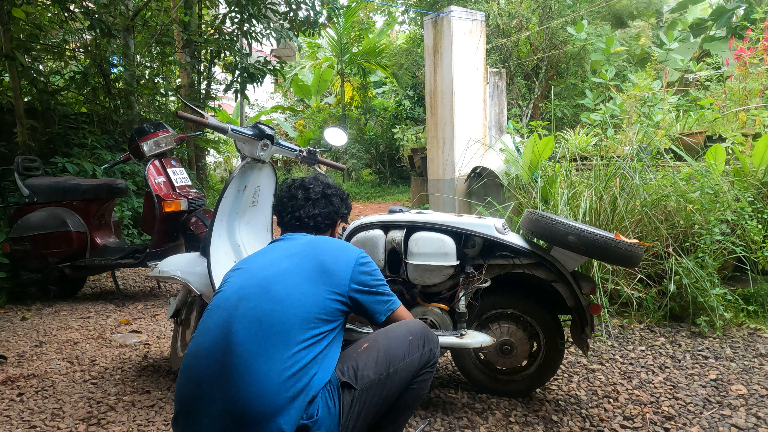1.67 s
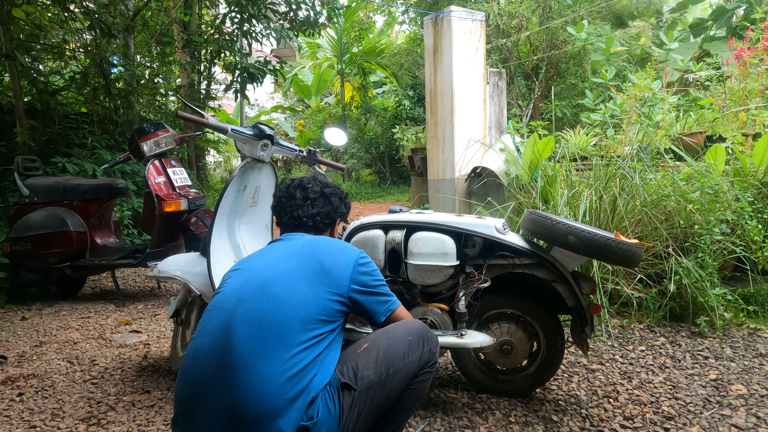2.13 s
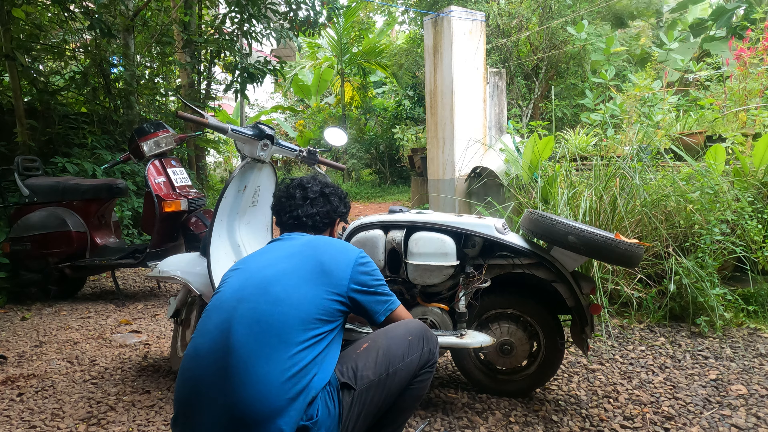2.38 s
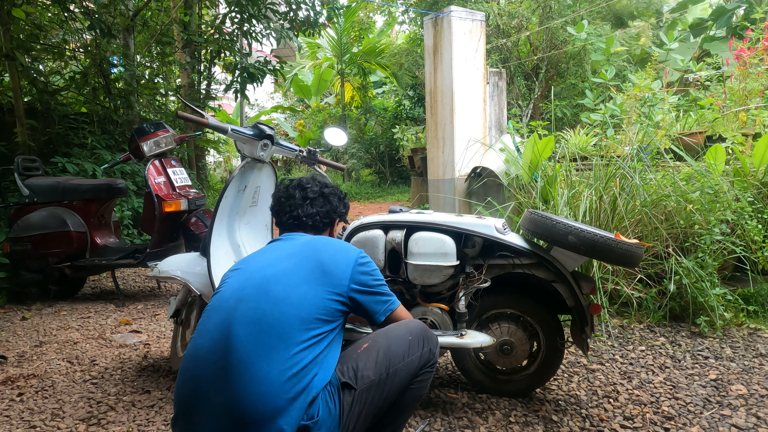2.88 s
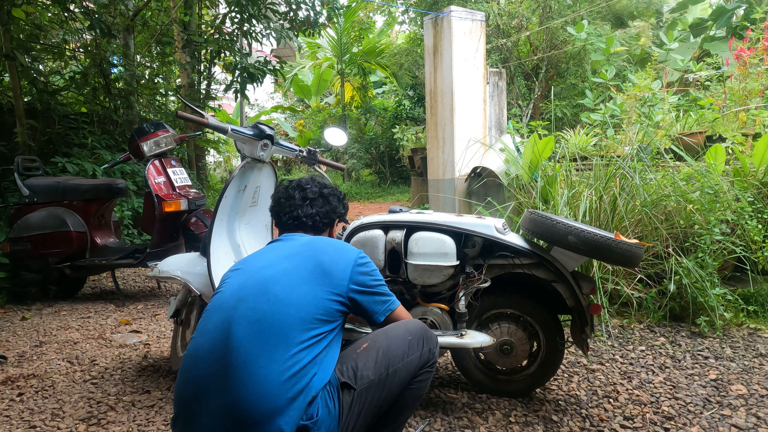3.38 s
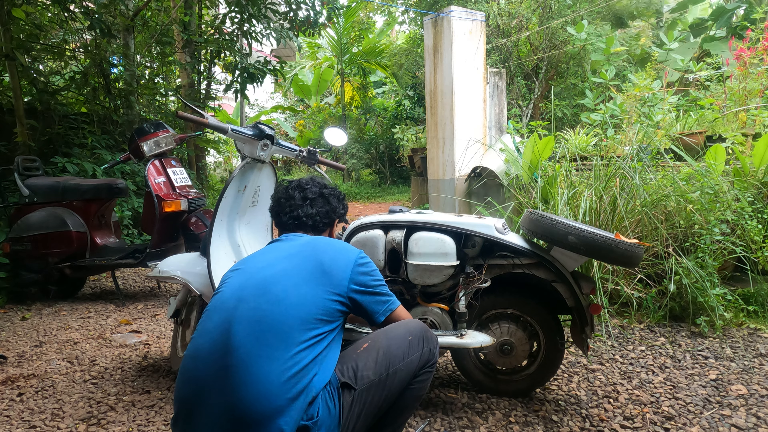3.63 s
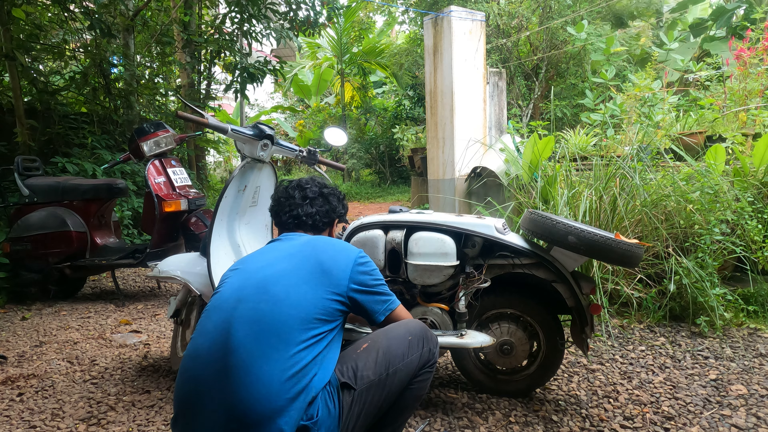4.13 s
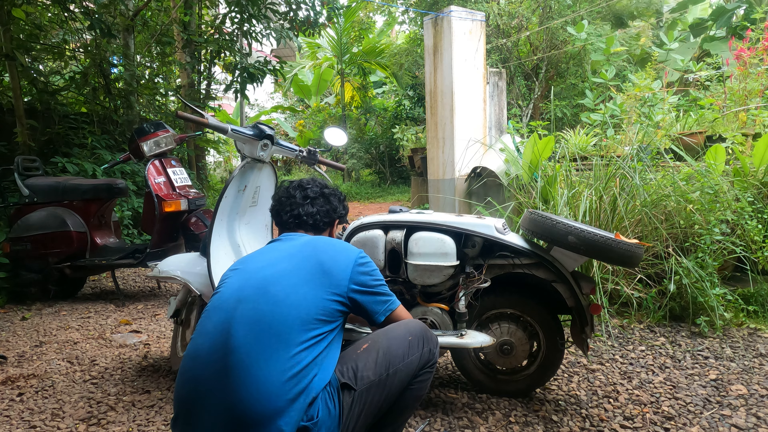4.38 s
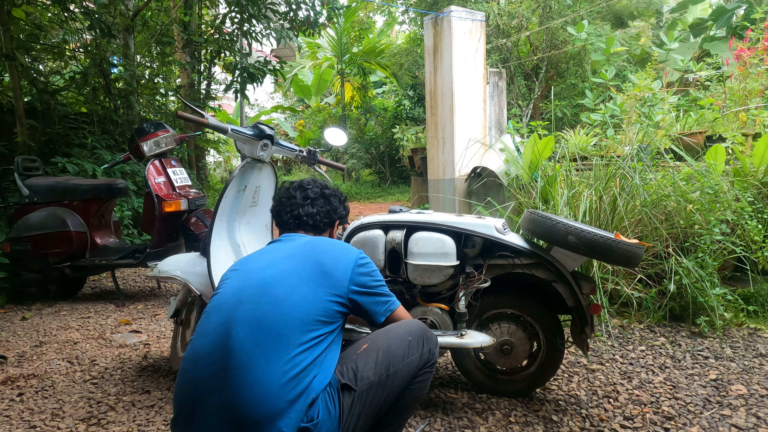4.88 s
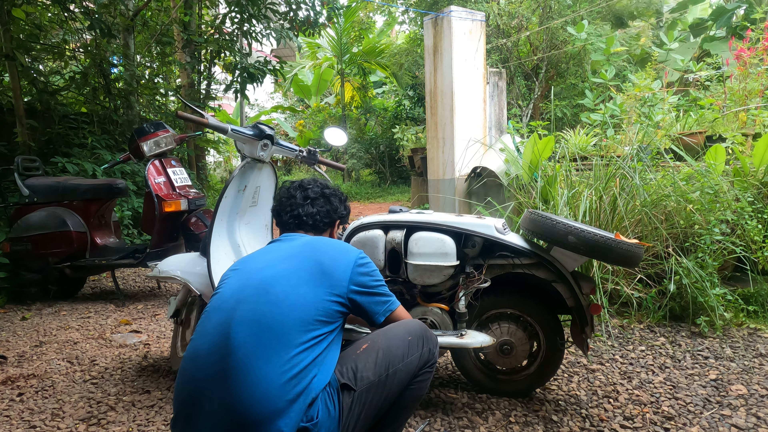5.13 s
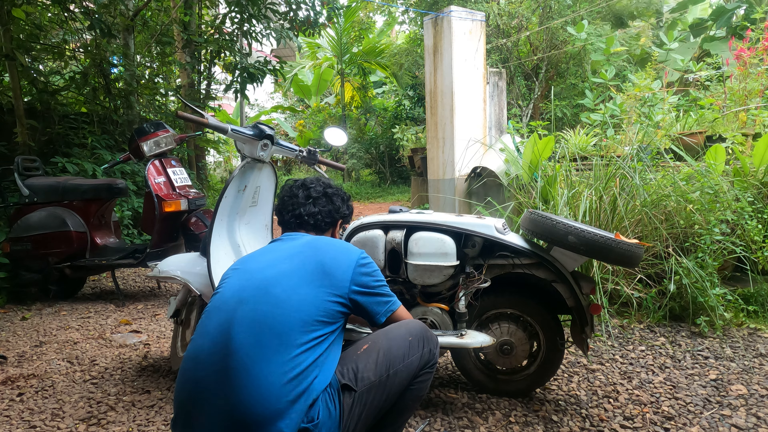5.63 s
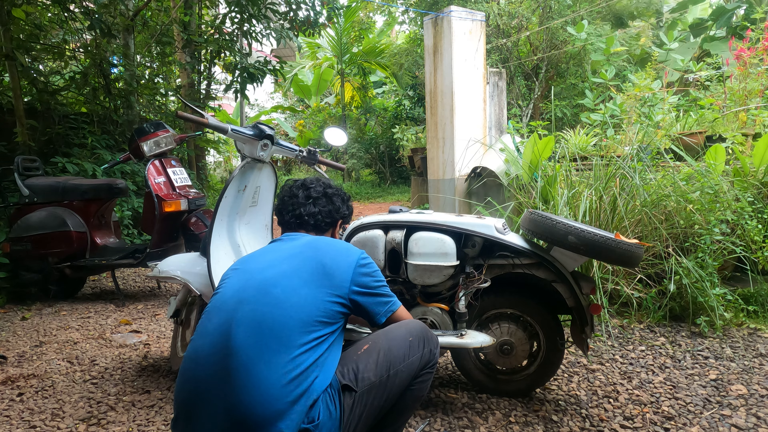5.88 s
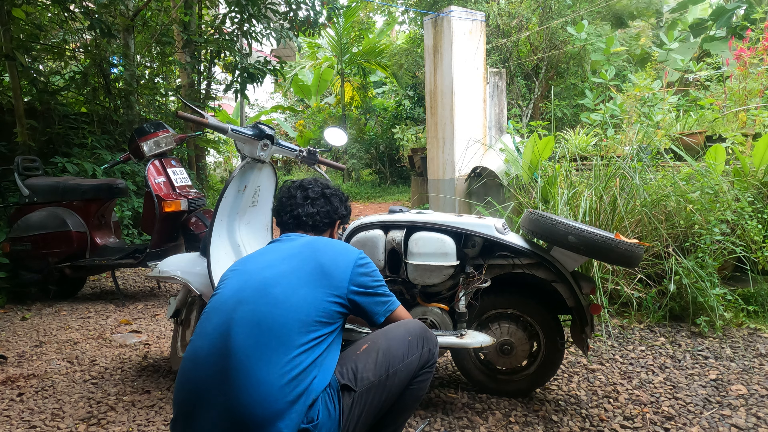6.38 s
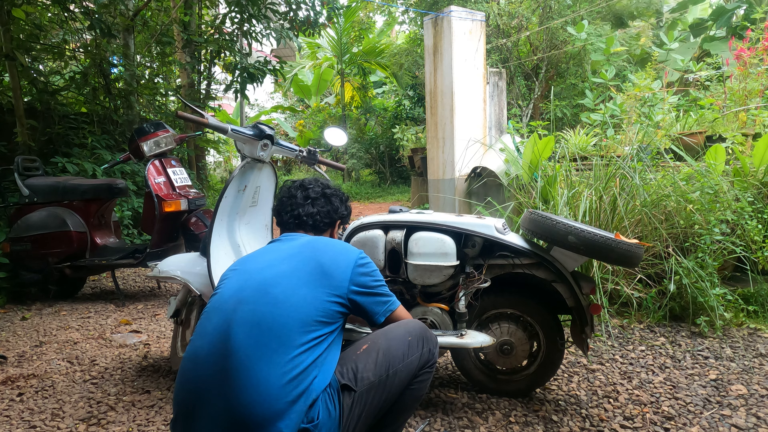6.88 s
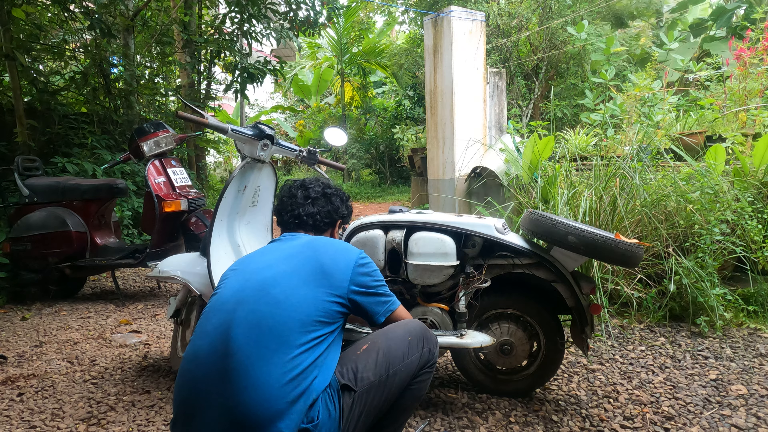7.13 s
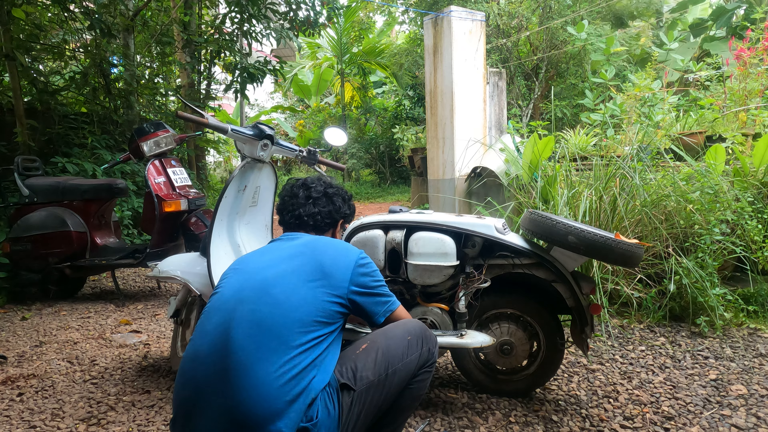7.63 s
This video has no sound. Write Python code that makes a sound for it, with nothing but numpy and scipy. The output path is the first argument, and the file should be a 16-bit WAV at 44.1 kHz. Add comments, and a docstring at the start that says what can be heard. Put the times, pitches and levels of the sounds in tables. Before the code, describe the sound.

A dense, piercing insect chorus dominates outdoors; soft metallic taps come early, then a burst of crunchy gravel shuffling from a squatting man, with faint distant birds.

```python
"""Two near cicadas repeat falling phrases in a leafy garden; a third holds a note and more blur far off.
Each song is a membrane buckled in pulses, heard direct and as scatter; shaped noise is the far chorus' hiss.
A man squatting at a scooter shifts on gravel (showers of clicks) and ticks metal (decaying partials).
Far off, a crow pulses air through its throat and a small bird pipes sines, over noise of traffic and wind.
Two microphones are sampled at 24 kHz, so a faint mirror image of the song lies above 12 kHz."""
import sys
import numpy as np
from scipy import signal
from scipy.fft import rfft, irfft
from scipy.io import wavfile
from scipy.ndimage import uniform_filter1d

SR = 44100
rng = np.random.default_rng(int(sys.argv[2]) if len(sys.argv) > 2 else 0)


def to_linear_factor(level_db):
    """Convert decibel levels (scalar or array-like) to linear amplitude factors."""
    exponent = np.asarray(level_db, float) / 20
    return 10 ** exponent


def file_out(sig):
    """Save sig as 16-bit WAV at sys.argv[1]."""
    # one column per channel
    cols = np.atleast_2d(sig).T
    # limit, then scale
    lim = np.clip(cols, -1, 1)
    pcm = np.round(lim * 32767).astype(np.int16)
    wavfile.write(sys.argv[1], SR, pcm)


N = 341775
T = np.arange(N) / SR  # s
HZ = np.fft.rfftfreq(N, 1 / SR)
SIDES = np.array([[1], [-1]])  # sign of a side signal at the left and right microphone
SAMPLING_HZ = 24000


def points(table, hz=HZ):
    """Gain per frequency through (Hz, dB) points on a log axis."""
    f, db = np.transpose(table)[:2]
    return to_linear_factor(np.interp(np.log(hz + 1), np.log(f + 1), db))


def curve(rows):
    """Straight lines through (s, value) points."""
    return np.interp(T, *np.transpose(rows))


def shape(x, gain):
    """Filter by a gain per frequency."""
    return irfft(rfft(x) * gain, N)


def unit(x):
    """Scale to rms 1."""
    return x / np.sqrt(np.mean(x ** 2))


def ring(x, modes):
    """Sum of (Hz, width in Hz, dB) resonances excited by x."""
    out = 0
    for hz, width, db in modes:
        b, a = signal.iirpeak(hz, hz / width, fs=SR)
        out = out + to_linear_factor(db) * signal.lfilter(b, a, x)
    return out


def walk(rate):
    """Smooth chance with about rate new values per second, spread near 1."""
    k = int(SR / rate)
    steps = np.repeat(rng.standard_normal(N // k + 1), k)
    return 1.287 * uniform_filter1d(uniform_filter1d(steps, k), k)[:N]


def swell(s, hold_s, db, rise_db_per_s, fall_db_per_s):
    """Gain that climbs to db at s, holds, and falls away."""
    early = np.clip(s - T, 0, None)
    late = np.clip(T - s - hold_s, 0, None)
    return to_linear_factor(db - rise_db_per_s * early - fall_db_per_s * late)


def garden(x, wet_db, t60, wide=0.97):
    """Direct sound plus decaying scatter from leaves and walls, partly different at the two microphones."""
    t = T[:int(.6 * SR)]
    tails = rng.standard_normal((2, len(t))) * np.exp(-np.log(1000) * t / t60)
    tails *= to_linear_factor(wet_db) / np.sqrt(np.sum(tails ** 2) / 2)
    fed = x * np.clip(T / .02, 0, 1) ** 2  # eases the scatter in at the start
    mid, side = (signal.fftconvolve(fed, tail)[:N] for tail in tails)
    return x + mid + wide * side * SIDES


# Spectrum of the low, distant air noise. Each row: frequency in Hz, relative density in dB per Hz.
AIR_SPECTRUM = [(12, -42), (20, -3), (44, -7), (103, -16.5), (193, -18), (229, -25), (629, -40.5),
                (1540, -35.5), (1690, -36.5), (1900, -31), (2470, -69), (4180, -120)]


def distant_traffic():
    """Far rumble: noise above 90 Hz, with less difference between the microphones at low pitch."""
    mid, side = rng.standard_normal((2, N))
    spread = shape(side, np.clip(HZ / 600, .25, .45))
    rumble = shape(mid + spread * SIDES, points(AIR_SPECTRUM) * (HZ > 90))
    return to_linear_factor(-58) * unit(rumble) * to_linear_factor(0.91 * walk(3.15))


# Spectrum of the far insect chorus' hiss. Each row: frequency in Hz, relative density in dB per Hz.
FAR_HISS_SPECTRUM = [(1500, -61), (2300, 9), (3600, -15.5), (5200, -5.5), (6500, -5.5), (8000, -7.5),
                     (9500, 13.5), (11000, -4), (12000, -14.5)]


def far_hiss():
    """Steady hiss of the far insect chorus, strongest near 2.3 and 9.5 kHz: noise, partly unlike in each ear."""
    hiss, hiss_side = rng.standard_normal((2, N))
    return to_linear_factor(-41.0) * unit(shape(hiss + 0.46 * hiss_side * SIDES, points(FAR_HISS_SPECTRUM)))


# Wind at the microphones. Each row: time in seconds, level before the gusts in dB.
WIND_LEVEL = [(0, -48.5), (1.8, -50.5), (2.5, -46.5), (3.1, -49.5), (3.5, -44), (4.0, -43.5), (4.6, -49.5),
              (6.0, -50), (6.6, -47), (7.75, -51.5)]


def wind():
    """Wind rumble up to 90 Hz, almost the same at both microphones, swaying in random gusts."""
    gust_db, gusts_per_s = 2.5, 12
    gust, side = rng.standard_normal((2, N))
    rumble = shape(gust + 0.037 * side * SIDES, points(AIR_SPECTRUM) * (HZ <= 90))
    return unit(rumble) * to_linear_factor(curve(WIND_LEVEL) + gust_db * walk(gusts_per_s))


# Calls of the far crow. Each row: start of the hold in seconds, hold in seconds, gain in dB.
CAW_CALLS = [(2.54, .14, -55.5), (6.6, 0.14, -57)]
# Resonances of its throat. Each row: frequency in Hz, width in Hz, gain in dB.
THROAT_MODES = [(1220, 53, -11), (1310, 60, -10), (1384, 80, -10), (1550, 211, -11), (1810, 45, 4)]


def crow():
    """Hoarse far caws: a pulse and a puff of air in each cycle ring the throat."""
    pitch_hz, jitter, breath_db = 90.5, .025, -1
    rise_db_per_s, fall_db_per_s = 150, 140
    turns = np.cumsum(pitch_hz * (1 + jitter * walk(40))) / SR
    pulses = np.diff(np.floor(turns), prepend=0)
    puffs = np.exp(-(turns % 1) / 0.97) * rng.standard_normal(N)
    hoarse = unit(pulses) + to_linear_factor(breath_db) * unit(puffs)
    band = points([(1050, -25), (1200, 0), (1950, -2.5), (2300, -20)])  # (Hz, dB)
    voice = unit(shape(ring(hoarse, THROAT_MODES), band))
    caws = voice * sum(swell(*row, rise_db_per_s, fall_db_per_s) for row in CAW_CALLS)
    return garden(caws, -8, .15)


# Notes of the small far bird. Each row: start in seconds, length in seconds, pitch in Hz, gain in dB.
PIPING_NOTES = [(4.65, .07, 989, -66.5), (4.745, .11, 989, -64.5), (4.845, .1, 989, -65),
                (4.94, .12, 989, -67.5), (6.64, .09, 796, -63.5)]


def small_bird():
    """Soft far piping: sine notes that swell and fade, a little unsteady in strength."""
    pipe = 0
    for s, length, hz, db in PIPING_NOTES:
        rise_and_fall = np.sin(np.pi * np.clip((T - s) / length, 0, 1)) ** 2
        pipe = pipe + to_linear_factor(db) * rise_and_fall * np.sin(2 * np.pi * hz * T)
    return garden(pipe * (1 + .2 * walk(60)), -8, .15)


# Touches on the scooter. Each row: start in seconds, gain in dB.
TOOL_TICKS = [(1.049, -57), (1.36, -59), (1.586, -60), (5.018, -61), (6.515, -54)]
# Partials of its side panel. Each row: frequency in Hz, mean strength in dB, time to fall 60 dB in seconds.
PANEL_MODES = [(650, 3, 0.025), (970, -1, 0.033), (1230, 6, 0.033), (1450, 10, 0.026), (1650, 4, 0.023)]


def ticks():
    """A tool touches the side panel softly: the push lasts a few ms, each touch mixes the partials anew."""
    out, t = np.zeros(N), T[:4000]
    push = 1 - np.exp(-t / 0.0024)
    for s, db in TOOL_TICKS:
        rings = 0
        for f, strength_db, t60 in PANEL_MODES:
            strength = to_linear_factor(strength_db + 2 * rng.standard_normal())
            rings = rings + strength * np.sin(2 * np.pi * f * t) * np.exp(-np.log(1000) * t / t60)
        i = int(s * SR)
        out[i:i + 4000] += to_linear_factor(db) * rings * push
    return garden(out, -1.7, 0.23)


# Scuffs of a shoe. Each row: start of the hold in seconds, hold in seconds, gain in dB, low crunch in dB.
SHOE_SCUFFS = [(3.68, 0.18, -71.5, 1.5), (4.966, 0.06, -62, -10), (5.258, .01, -63, -12),
               (5.413, 0.036, -53, -10), (5.464, .04, -44, -11), (5.585, .015, -43, -9),
               (5.683, 0.029, -44, -11), (5.877, 0.015, -47, 3), (6.146, 0.038, -44, -10),
               (6.257, .12, -66.5, 2), (6.523, 0.099, -54, -14), (7.096, .3, -75.5, 5),
               (7.456, .02, -71, 4), (7.696, .06, -66, 4)]
# Resonances of the gravel bed, the low crunch first. Each row: frequency in Hz, width in Hz, gain in dB.
GRAVEL_MODES = [(340, 260, 1.5), (630, 450, -2), (880, 270, 2), (1050, 220, 3), (1600, 1100, -9)]


def shoe():
    """Many stones slip in soft clicks of scattered size and ring the bed of gravel."""
    press_db_per_s, lift_db_per_s = 243, 205
    slips = rng.random(N) < 6000 / SR  # 6000 a second on average
    clicks = slips * to_linear_factor(2.2 * rng.exponential(size=N)) * rng.standard_normal(N)
    low = unit(ring(ring(clicks, GRAVEL_MODES[:2]), [(480, 1050, 0)]))
    high = unit(ring(ring(clicks, GRAVEL_MODES[2:]), [(990, 2000, 0)]))
    scuffs = 0
    for s, hold_s, db, low_db in SHOE_SCUFFS:
        gain = swell(s, hold_s, db, press_db_per_s, lift_db_per_s)
        scuffs = scuffs + gain * (to_linear_factor(low_db) * low + 0.4 * high)
    return garden(scuffs, -6.5, 0.11)


def cicada(hz, harmonics_db, pulse_hz, pulsing, rough_hz, rasp, bend=0.067):
    """A ringing membrane buckled in pulses: harmonics with side lines; left and right membrane differ a little."""
    pulse_rate = pulse_hz * (1 + 0.00606 * walk(20))
    beat = 2 * np.pi * np.cumsum(pulse_rate) / SR + rng.uniform(0, 2 * np.pi)
    # each buckling also bends the pitch, so upper side lines outweigh lower ones
    phase = 2 * np.pi * np.cumsum(hz + rough_hz * walk(150)) / SR + bend * np.sin(beat)
    fundamental = np.exp(1j * phase)
    swing = np.cos(beat) + 0.065 * np.cos(beat / 2)  # every other pulse differs
    tone, harmonic = 0, 1
    for db, depth in zip(harmonics_db, pulsing):
        harmonic = harmonic * fundamental
        tone = tone + to_linear_factor(db) * harmonic.imag * np.exp(depth * swing) / np.i0(depth)
    # no two pulses are equally strong: a rasp around every line
    return np.sqrt(2) * tone * (1 + rasp * walk(500))


# The far cicadas together. Each row: time in seconds, level in dB.
CROWD_LEVEL = [(0, -34), (.3, -34.5), (2, -33), (3.5, -33), (5.5, -32), (7.75, -33.5)]
# Strength of harmonics 1-5 in dB.
CROWD_HARMONICS = [-7, -8.5, -17.5, -0.5, -23]
# Depth of the pulsing in harmonics 1-5.
CROWD_PULSE_DEPTH = [0.27, 0.81, 0.72, 1, .8]


def crowd(count=10):
    """Far cicadas, each with its own pitch, phrase length and pulse rate, heard mostly as scatter."""
    out = 0
    for k, (a, b, c) in enumerate(rng.random((count, 3))):
        turn = (T / (.3 + .3 * a) + b) % 1  # place within the falling phrase
        hz = 2280 + 200 * (k + .5) / count + 30 * uniform_filter1d(1 - 2 * turn, 1500)
        song = cicada(hz, CROWD_HARMONICS, 215 + 80 * c, CROWD_PULSE_DEPTH, rough_hz=5., rasp=0.32)
        out = out + song * to_linear_factor(3.05 * walk(8))
    return unit(garden(out, 7.6, 0.32, wide=0.18)) * to_linear_factor(curve(CROWD_LEVEL))


# The held note, which starts at the first row. Each row: time in seconds, gain before the throb in dB.
HELD_NOTE = [(1.8, -57), (2.2, -51), (2.9, -50.5), (3.1, -47.5), (3.7, -39), (5.2, -38.5), (6, -39.5),
             (7.75, -40.5)]
# Strength of harmonics 1-5 in dB.
HOLDER_HARMONICS = [0, -13.5, -19, -11, -39]
# Depth of the pulsing in harmonics 1-5, before its fading.
HOLDER_PULSE_DEPTH = [0.63, 0.96, 0.35, .6, .6]
# Fading of the pulsing. Each row: time in seconds, factor on the pulsing depth.
PULSE_FADING = [(3.0, 1.7), (3.9, .3)]
# Tiring of the singer. Each row: time in seconds, throb depth from 0 to 1.
THROB_DEPTH = [(3.2, .1), (6, 0.79)]


def holder():
    """The held note settles in pitch, and throbs and wavers more as it tires."""
    start_hz, end_hz, settle_s = 2392, 2364.5, 2.
    since = np.clip(T - HELD_NOTE[0][0], 0, None)
    hz = end_hz + (start_hz - end_hz) * np.exp(-since / settle_s)
    depth = np.clip(curve(THROB_DEPTH), 0, 1)
    throb = 1 - depth * np.clip(1.54 * walk(15), 0, 1)
    fading = curve(PULSE_FADING)
    note = cicada(hz + 3 * depth * walk(12), HOLDER_HARMONICS, 281., np.outer(HOLDER_PULSE_DEPTH, fading),
                  rough_hz=1.45, rasp=0.14, bend=0.22 * fading)
    return garden(note * to_linear_factor(curve(HELD_NOTE)) * throb * (since > 0), -1.5, 0.22)


def phrases(rows, sag, last_s, gap_s):
    """Pitch of the fourth harmonic and gain of falling phrases, with a short pause before each restart."""
    starts, db = np.transpose(rows)
    ends = np.append(starts[1:], last_s) - gap_s
    # a steady mean rate of fall: long phrases span more, and all pass one pivot pitch
    pivot_hz, above, hz_per_s, third, two_thirds = sag
    fall_hz = hz_per_s * (ends - starts)
    pitch = pivot_hz + np.outer(fall_hz, above - np.array([0, third, two_thirds, 1]))
    hz = np.interp(T, np.linspace(starts, ends, 4).T.ravel(), pitch.ravel())
    k = np.clip(np.searchsorted(starts, T, "right") - 1, 0, None)  # phrase now sung
    gain = to_linear_factor(db[k]) * (T < ends[k] + gap_s / 2) * (T > starts[k] + gap_s / 2)
    return uniform_filter1d(hz, 1500), uniform_filter1d(gain, 600)


# Depth of the pulsing in harmonics 1-5: the upper ones die faster after each buckling.
NEAR_PULSE_DEPTH = [.1, .55, .6, .48, .6]


def singer(rows, sag, path, last_s, harmonics_db, pulse_hz, wet_db):
    """A near cicada; its loudness follows the echo pattern as the pitch glides."""
    hz, gain = phrases(rows, sag, last_s, gap_s=.03)
    song = cicada(hz / 4, harmonics_db, pulse_hz, NEAR_PULSE_DEPTH, rough_hz=1.14, rasp=0.31, bend=0.0042)
    flutter = to_linear_factor(1.64 * walk(25))
    return garden(shape(song * gain * flutter, points(path)), wet_db, 0.99)


# Phrases of the lower near cicada. Each row: start in seconds, gain before the echo path in dB.
LOW_PHRASES = [(-0.2, -39.7), (0.25, -35.7), (0.72, -35.3), (1.2, -36.9), (1.67, -37), (2.14, -37.2),
               (2.53, -36.7), (2.9, -37.7), (3.28, -33.6), (3.64, -36.7), (3.96, -36.6), (4.31, -36.1),
               (4.65, -37.4), (4.95, -38), (5.25, -36.7), (5.57, -37.6), (5.87, -39.9), (6.13, -34.8),
               (6.4, -38.9), (6.67, -37.2), (6.98, -36.1), (7.24, -35.2), (7.5, -36.6)]
# Its fall: pivot of the fourth harmonic in Hz, share of the fall above the pivot, mean sag in Hz per second,
# share fallen after one third and after two thirds of the phrase.
LOW_FALL = (9375, .2, 470, .42, .82)
# Echoes off ground and walls add or cancel by pitch. Each row: frequency in Hz, gain in dB.
LOW_ECHOES = [(8950, -6), (9000, -6), (9047, 1), (9072, -6), (9097, 0), (9122, -6), (9149, 0), (9195, -8),
              (9228, -2), (9255, -5), (9282, 1), (9305, -7), (9325, -4), (9345, -10), (9366, -1),
              (9385, -7), (9400, -7), (9430, -11)]
# Strength of harmonics 1-5 in dB, before the echo path.
LOW_HARMONICS = [-11.5, -11.5, -17.5, 3.5, -21]


def low_singer():
    """The lower near cicada, with shorter phrases and 225 bucklings a second."""
    return singer(LOW_PHRASES, LOW_FALL, LOW_ECHOES, 7.78, LOW_HARMONICS, pulse_hz=225., wet_db=-10)


# Phrases of the higher near cicada. Each row: start in seconds, gain before the echo path in dB.
HIGH_PHRASES = [(-0.22, -36.6), (0.34, -35), (0.9, -35.3), (1.49, -33.9), (2.07, -34.3), (2.64, -33.7),
                (3.17, -35.8), (3.69, -35.6), (4.16, -34.8), (4.63, -35.1), (5.08, -35), (5.53, -35),
                (5.98, -34.9), (6.44, -34.7), (6.86, -34.9), (7.29, -35)]
# Its fall: pivot of the fourth harmonic in Hz, share of the fall above the pivot, mean sag in Hz per second,
# share fallen after one third and after two thirds of the phrase.
HIGH_FALL = (9648, 1, 660, .31, .79)
# Echoes off ground and walls add or cancel by pitch. Each row: frequency in Hz, gain in dB.
HIGH_ECHOES = [(2400, -2), (2415, 1), (2440, -5), (2465, -2), (2490, -3), (2520, -5), (9600, -7),
               (9645, -5), (9668, -1), (9700, -9), (9725, -9), (9752, 0), (9780, -10), (9820, -8),
               (9850, -14), (9889, 1), (9920, -12), (9955, 0), (9990, -8), (10035, -2), (10070, -10),
               (10110, -3), (10140, -9), (10175, -4), (10220, -8)]
# Strength of harmonics 1-5 in dB, before the echo path.
HIGH_HARMONICS = [-9.5, -8, -16, 3, -40]


def high_singer():
    """The higher near cicada, with longer phrases and 287 bucklings a second."""
    return singer(HIGH_PHRASES, HIGH_FALL, HIGH_ECHOES, 7.76, HIGH_HARMONICS, pulse_hz=287., wet_db=-12)


def scene():
    """Near and far cicadas over the garden and the work."""
    background = distant_traffic() + far_hiss() + wind() + crow() + small_bird()
    work = ticks() + shoe()
    return background + work + crowd() + holder() + low_singer() + high_singer()


# Unequal microphones. Each row: frequency in Hz, left minus right in dB.
MICROPHONE_BALANCE = [(60, -2.5), (110, 1.5), (200, -4.5), (380, -3), (700, -2), (1290, 0), (2380, -0.5),
                      (4400, 0), (8120, 6), (15000, -3)]


def microphones(dry):
    """Two unequal microphones, sampled at 24 kHz, which cuts everything above half that rate."""
    lean = np.sqrt(points(MICROPHONE_BALANCE))
    return shape(dry, np.array([lean, 1 / lean]) * (HZ < SAMPLING_HZ / 2))


# Strength of the mirror image. Each row: frequency in Hz, gain in dB.
MIRROR_GAIN = [(12000, -4.5), (12600, -11), (13200, -9), (14300, -22.5), (15000, -30), (15130, -36),
               (15200, -80)]


def mirror_image(base):
    """Sampling leaves a mirror image: each pitch above 8 kHz returns at the sampling rate minus itself."""
    top = signal.hilbert(shape(base, HZ > 8000))
    image = np.real(np.conj(top) * np.exp(2j * np.pi * SAMPLING_HZ * T))
    return shape(image, points(MIRROR_GAIN))


def low_pass(x):
    """Removes everything above the highest recorded frequency."""
    return signal.sosfilt(signal.butter(12, 16270, fs=SR, output="sos"), x)


def record(dry):
    """The garden through the two microphones, with the mirror image that sampling adds."""
    base = microphones(dry)
    mix = base + mirror_image(base)
    return low_pass(mix)


dry = scene()
out = record(dry)
file_out(out)
```